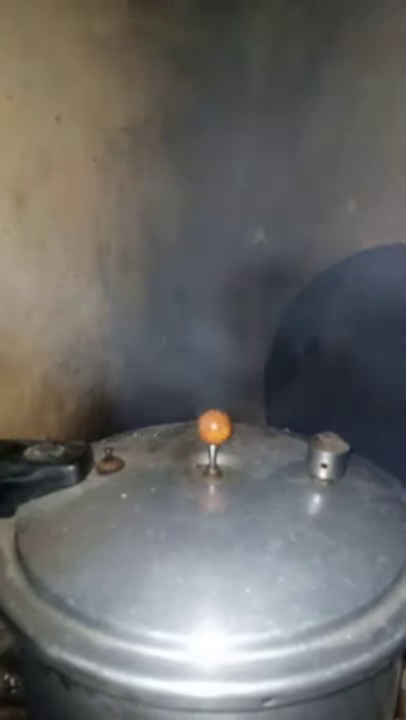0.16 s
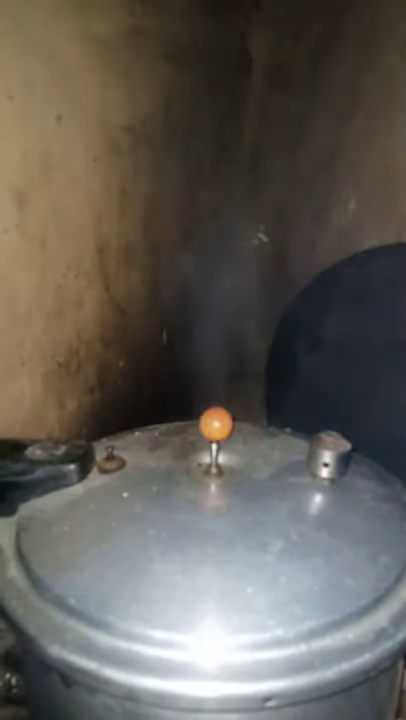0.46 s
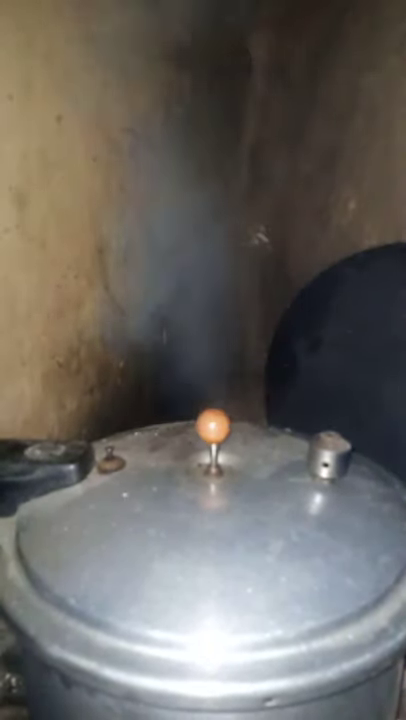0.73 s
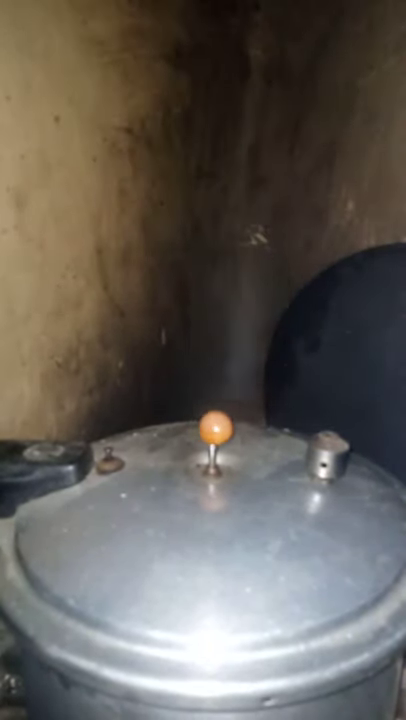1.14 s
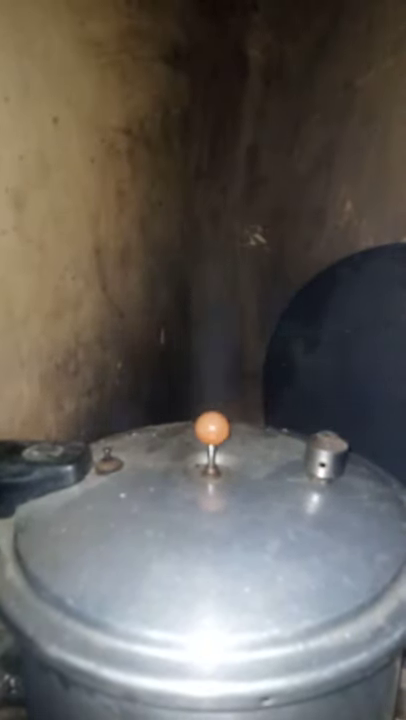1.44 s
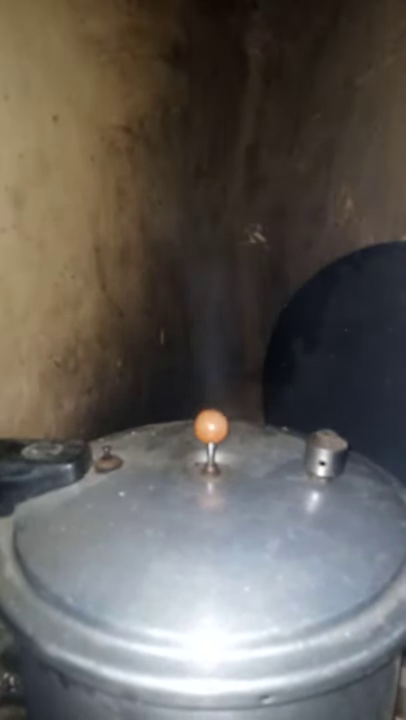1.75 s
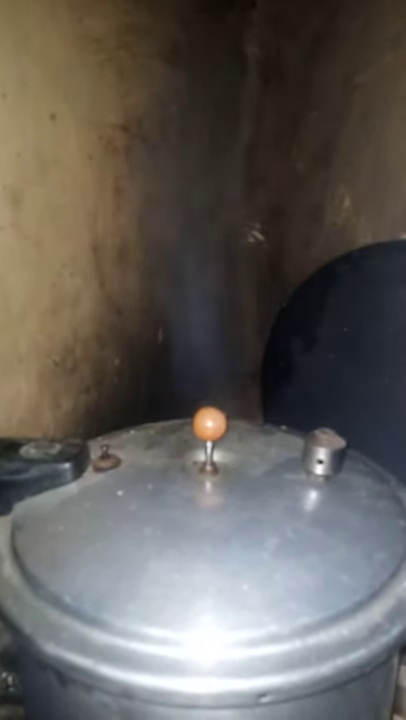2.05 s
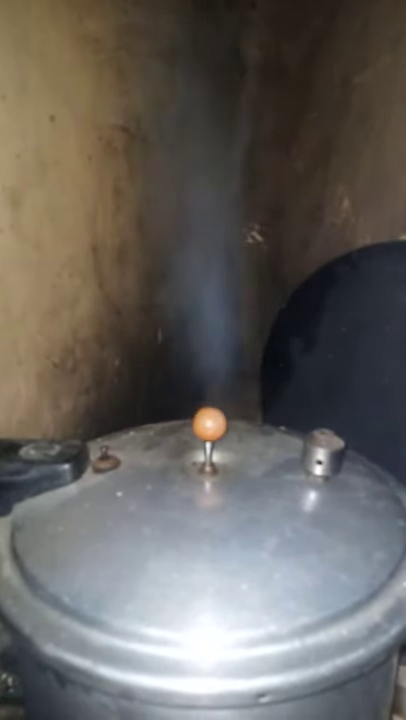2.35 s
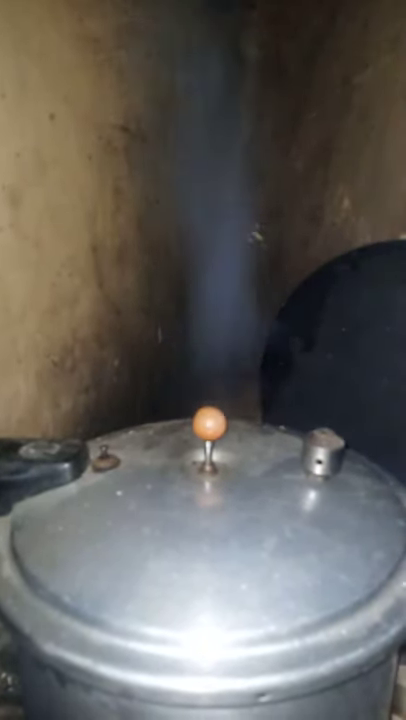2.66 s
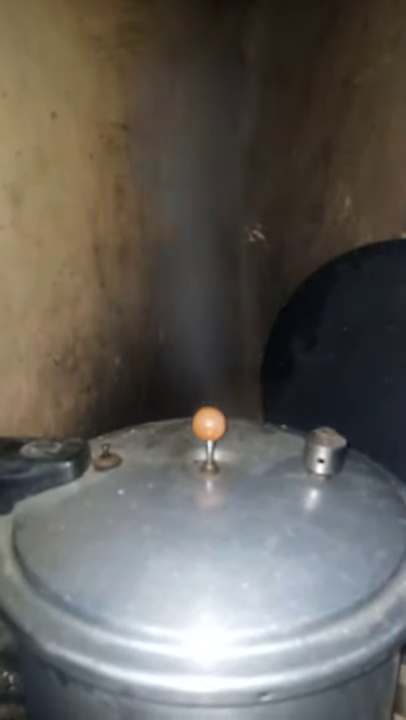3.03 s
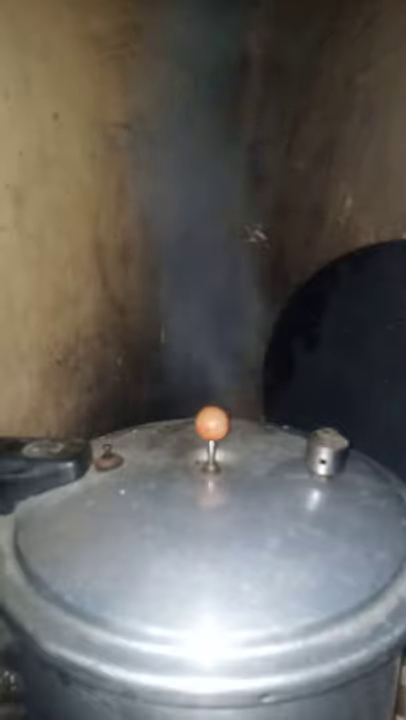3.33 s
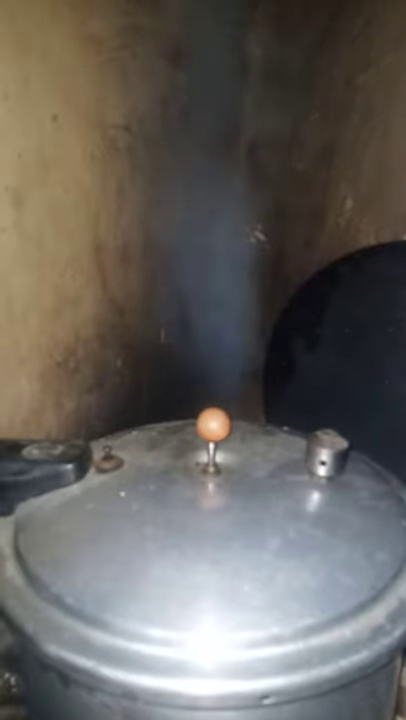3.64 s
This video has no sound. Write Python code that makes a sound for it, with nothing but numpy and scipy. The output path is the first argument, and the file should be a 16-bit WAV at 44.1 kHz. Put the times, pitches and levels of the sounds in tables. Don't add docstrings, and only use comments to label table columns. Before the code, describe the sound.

Continuous harsh steam jet from a pressure cooker, chopped by its rocking weight, first irregular with spitting surges, then steady pulsing. Close and nearly dry, with soft air thuds on the microphone and a very short room tail.

```python
import sys
import numpy as np
from scipy import signal
from scipy.fft import rfft, irfft
from scipy.io import wavfile
from scipy.ndimage import uniform_filter1d

SR = 44100
rng = np.random.default_rng(int(sys.argv[2]) if len(sys.argv) > 2 else 0)


def to_wav(s):
    ch = np.atleast_2d(s).T
    pcm = np.round(np.clip(ch, -1, 1) * 32767)
    wavfile.write(sys.argv[1], SR, pcm.astype(np.int16))


def ratio(d):
    e = np.asarray(d, float) / 20
    return 10 ** e


N = 167139


def evened(x):
    return x / np.sqrt(np.mean(x ** 2) + 1e-20)


def read(points, hz):
    f, value = np.transpose(points)
    return np.interp(np.log(hz + 1), np.log(f + 1), value, left=-80)


def drift(t, low_hz, top_hz):
    f = np.geomspace(low_hz, top_hz, num=30)[:, None]
    sines = np.sin(2 * np.pi * (f * t + rng.random(f.shape)))
    return evened((sines / np.sqrt(f)).sum(0))


def colour(x, db):
    return irfft(rfft(x) * ratio(db), len(x))


def bump(t, s, length):
    return np.exp(-4 * np.log(2) * ((t - s) / length) ** 2)


def below(hz, corner_hz):
    return 1 / (1 + (hz / corner_hz) ** 4)


# time in [s], depth in [dB], length in [s].
STUMBLES = [(0.055, 5.7, 0.022), (0.135, 6.8, 0.015), (0.269, 3.5, 0.033), (0.331, 6.1, 0.033),
            (0.418, 9.1, 0.019), (0.483, 9.1, 0.015), (0.503, 3.0, 0.009), (0.596, 5.7, 0.033),
            (0.652, 8.2, 0.024), (0.729, 14.0, 0.014), (0.75, 3.1, 0.015), (0.778, 4.4, 0.013),
            (0.821, 5.9, 0.012), (0.857, 3.2, 0.009), (0.904, 9.6, 0.026), (0.969, 9.8, 0.019),
            (1.057, 9.5, 0.019), (1.111, 6.2, 0.018), (1.142, 2.6, 0.009), (1.201, 5.8, 0.022),
            (1.26, 6.2, 0.014), (1.339, 8.4, 0.033), (1.374, 2.6, 0.01), (1.414, 3, 0.01),
            (1.445, 9, 0.017), (1.512, 11, 0.02), (1.552, 4, 0.012), (1.586, 3.5, 0.014), (1.65, 6, 0.022)]
# time in [s], turns counted so far [count].
ROCK = [(1.718, 0), (1.857, 1), (2.002, 2), (2.851, 8), (2.998, 9), (3.14, 10), (3.285, 11), (3.851, 15)]
# place in the turn [0-1], treble depth in [dB], bass depth in [dB],
# length in [s].
TURN = [
    (.0, 13, 6.5, .02),
    (.235, 5, 1.2, .011),
    (.46, 12.5, 4, .017),
    (.55, 2.5, 3.5, .016),
    (.775, 6.5, 2.5, .017),
]


def chokes(t):
    stumble_treble, stumble_bass = 0.94, 0.78
    spread_db, jitter_s = 1.2, .0015
    s, turns = np.transpose(ROCK)
    starts = np.interp(np.arange(turns[-1] + 1), turns, s)
    rows = [(s, stumble_treble * db, stumble_bass * db, length) for s, db, length in STUMBLES]
    for start, end in zip(starts, starts[1:]):
        for place, treble_db, bass_db, length in TURN:
            late, deep = rng.standard_normal(2)
            when = start + place * (end - start) + jitter_s * late
            rows.append((when, treble_db + spread_db * deep, bass_db + .5 * spread_db * deep, length))
    s, treble_db, bass_db, length = np.transpose(rows)[:, :, None]
    length = length * np.where(t > s, .85, 1.15)
    shape = bump(t, s, length)
    return (bass_db * shape).sum(0), (treble_db * shape).sum(0)


# time in [s], extra roar in [dB], length in [s].
SPITS = [
    (.0, 5, .06),
    (.11, 3, .04),
    (.195, 7, .07),
    (.39, 3, .08),
    (.55, 2, .05),
    (.69, 2, .05),
]


def wet_surges(t):
    return sum(db * bump(t, s, length) for s, db, length in SPITS)


# time in [s], jet level in [dB].
PRESSURE = [(0, -31), (.07, -29), (.15, -29.5), (.27, -31), (.4, -29.5), (.6, -30.5), (.8, -31),
            (1.1, -30.1), (1.42, -30), (1.7, -31), (2.1, -30), (2.5, -30.5), (2.9, -31.5), (3.2, -31.5),
            (3.5, -31.5), (3.79, -31)]


def turbulence():
    hop, size = 64, 256
    frames = N // hop + 5
    hz = np.fft.rfftfreq(size, 1 / SR)[:, None]
    t = np.arange(frames) * hop / SR
    real, imaginary, patches = rng.standard_normal((frames, size // 2 + 1, 3)).T
    patches = uniform_filter1d(patches, size=9, axis=0)
    patches = evened(uniform_filter1d(patches, size=12, axis=1))

    high = 1 / (1 + (9000 / (hz + 1)) ** 4)
    wet = 1 / (1 + (hz / 4500) ** 2)
    bass_db, treble_db = chokes(t)
    choked_low = (1 - high) / (1 + (700 / (hz + 1)) ** 4)

    field_db = np.interp(t, *np.transpose(PRESSURE)) + wet * wet_surges(t)
    field_db = field_db - high * treble_db - choked_low * bass_db
    field_db = field_db + (0.93 + 2.6 * below(hz, 900)) * patches
    field_db = field_db + .5 * drift(t, 11, 110)
    field_db = field_db + 0.49 * wet * drift(t, 4.4, 23) + 0.42 * high * drift(t, 30, 160)
    grains = (real + 1j * imaginary) * ratio(field_db)
    return evened(signal.istft(grains, nperseg=size, noverlap=size - hop)[1][:N])


# frequency in [Hz], density in [dB
# per Hz].
JET = [(250, -51), (450, -40), (780, -43), (910, -30), (1750, -27), (2400, -29.5), (3220, -26),
       (3400, -19.5),
       (6100, -18), (7400, -9.5), (9000, -23), (11200, -12), (13000, -20), (14000, -14), (14750, -1),
        (15700, -3.5)]
# frequency in [Hz], width in [Hz], lift in [dB].
LID = [(425, 40, 4), (600, 200, 3), (1235, 60, 4), (1480, 90, 4), (1685, 60, 4), (1920, 200, 6.5),
       (2650, 80, 2), (2990, 70, 5), (4110, 120, 3.5), (4750, 1600, 6.5), (5650, 300, 1.5), (6300, 90, 2),
       (6610, 170, 5.5), (8300, 300, 3.5)]


def jet():
    hz = np.fft.rfftfreq(N, 1 / SR)
    lid_db = sum(db / (1 + (2 * (hz - mode_hz) / width) ** 2) for mode_hz, width, db in LID)
    return ratio(-25.5) * evened(colour(turbulence(), read(JET, hz) + lid_db))


def kitchen(x):
    t60_s, spacing = .2, 22
    at = np.arange(120, SR // 2, spacing)
    at = at + rng.integers(0, spacing, len(at))
    taps = np.zeros(SR // 2 + spacing)
    taps[at] = rng.choice([-1., 1.], len(at)) * ratio(-60 * at / SR / t60_s)
    return signal.fftconvolve(x, taps / np.linalg.norm(taps))[:N]


# frequency in [Hz], density in [dB per Hz].
DRAUGHT = [(22, -9), (40, -10.5), (70, -5), (120, 1.5), (190, -5.5), (260, -10.5), (400, -23.5),
           (700, -18.5)]


def draught():
    eddies_per_s, calming_db_per_s = 140, 0.86
    t, hz = np.arange(N) / SR, np.fft.rfftfreq(N, 1 / SR)
    lumps_db = 1.5 * np.interp(t, t[::64], drift(t[::64], 6, 40)) - calming_db_per_s * t
    eddies = (rng.random(N) < eddies_per_s / SR) * rng.standard_normal(N)
    stir = 1.04 * rng.standard_normal(N) + 0.54 * evened(eddies)
    spectrum_db = read(DRAUGHT + [(1500, -61)], hz)
    return ratio(-67) * evened(colour(stir * ratio(lumps_db), spectrum_db))


# time in [s], level in [dB], pitch in [Hz], sign of the push [+-1].
PUFFS = [(.155, -51, 105, 1), (.254, -57, 115, 1), (.531, -51, 150, -1), (.547, -45, 125, 1),
         (.614, -58, 105, 1), (.746, -47, 95, -1), (.7995, -39, 115, 1), (.8235, -47, 100, 1),
         (.879, -57, 115, 1), (.955, -55, 115, 1), (1.02, -58, 115, 1), (1.086, -57, 115, 1),
         (1.198, -59, 115, 1), (1.38, -54, 90, 1), (1.933, -56, 130, -1), (1.972, -54, 130, 1),
         (2.096, -54, 140, 1), (2.466, -59, 105, 1), (2.647, -58, 115, 1), (2.866, -59, 125, 1),
         (3.12, -57, 90, 1)]


def puffs():
    t = np.arange(N) / SR
    out = np.zeros(N)
    for s, db, hz, sign in PUFFS:
        since = t - s
        turns = since * hz
        bent = turns - 0.31 * np.tanh(turns) ** 2 * (turns > 0)
        fade = np.exp(-(turns / np.where(turns < 0, .5, 1.1)) ** 2)
        thud = np.sin(2 * np.pi * bent) * fade
        knock = 0.4 * np.sin(2 * np.pi * 300 * since) + 0.51 * np.sin(2 * np.pi * 600 * since)
        knock = knock * np.exp(-((since + 0.00079) / 0.0019) ** 2)
        sharp = ratio(.5 * np.minimum(db + 40, 0))
        out += np.sign(sign) * ratio(db + 1.0) * (thud + sharp * knock)
    return out


def scene():
    steam = jet()
    mix = steam + ratio(-19) * kitchen(steam) + draught() + puffs()
    return np.tile(mix, (2, 1))


def gate(x):
    depth_db, top_hz = 5, 900
    hz, _, z = signal.stft(x, SR, nperseg=1024, noverlap=768)
    level_db = 10 * np.log10(uniform_filter1d(abs(z) ** 2, size=3, axis=-1) + 1e-20)
    usual_db = np.median(level_db, axis=-1, keepdims=True)
    under = np.clip((usual_db - level_db) / 6 + .5, 0, 1)
    gain_db = -depth_db * under * below(hz[:, None], top_hz)
    return signal.istft(z * ratio(gain_db), SR, nperseg=1024, noverlap=768)[1][:, :N]


def roll_off(x):
    return signal.sosfilt(signal.butter(12, 17090, fs=SR, output="sos"), x)


def record(dry):
    edge = signal.firwin(1501, 15750, window=("kaiser", 11), fs=SR)
    mix = signal.oaconvolve(gate(dry), edge[None], "same")
    return roll_off(mix)


dry = scene()
out = record(dry)
to_wav(out)
```